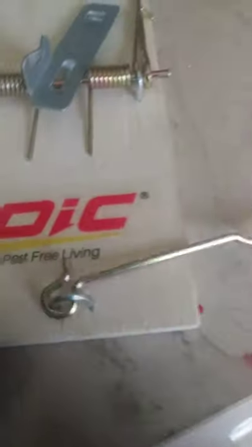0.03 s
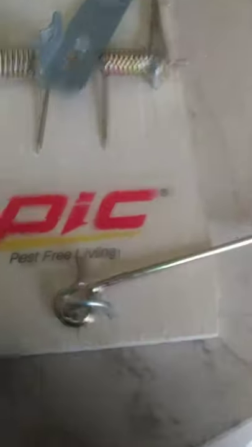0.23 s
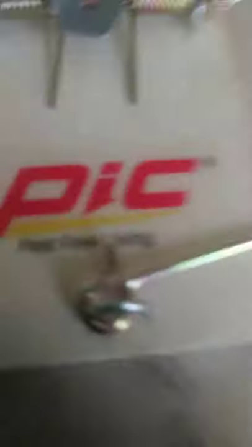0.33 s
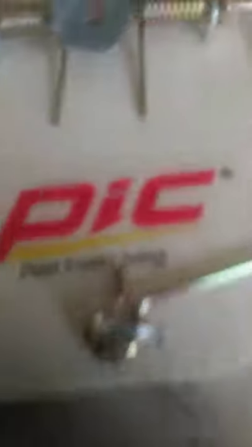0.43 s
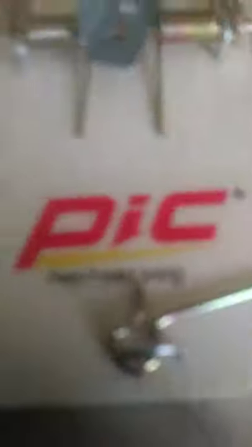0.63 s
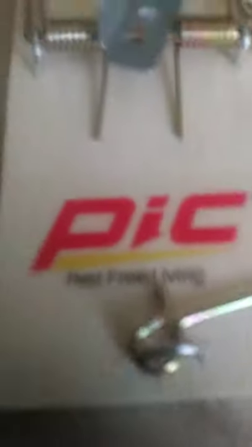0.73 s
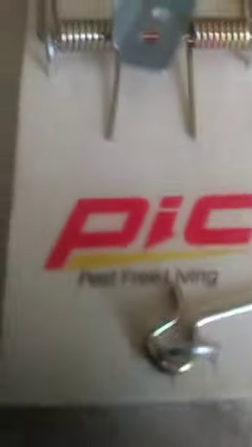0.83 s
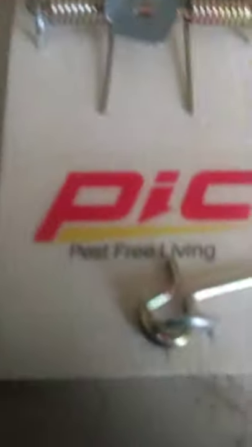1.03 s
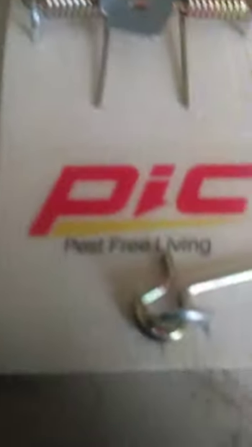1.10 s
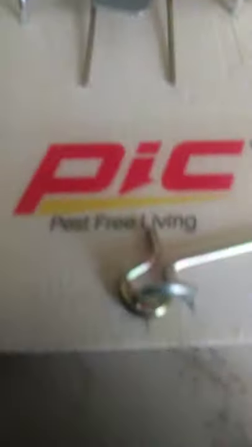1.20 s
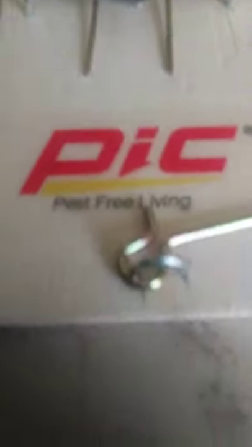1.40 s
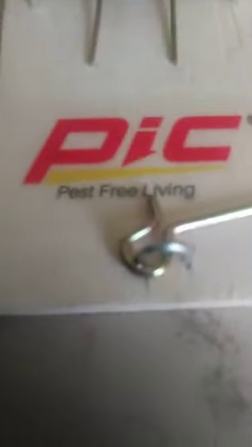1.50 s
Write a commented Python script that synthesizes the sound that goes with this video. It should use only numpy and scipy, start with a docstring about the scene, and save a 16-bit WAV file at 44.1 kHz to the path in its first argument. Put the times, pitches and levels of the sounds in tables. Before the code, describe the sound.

A finger scrapes a hand-held camera's casing right by the microphone. After a faint rustle and a soft tap at about 0.1 seconds, the loud, dry scrape runs from 0.2 to 0.5 seconds, catching with small bumps and ringing the casing slightly, then stops abruptly. Faint grip rustles and tiny ticks continue until about 1.5 seconds over quiet, steady room noise.

```python
"""A finger scrapes across a small camera's casing, right by the microphone: loud, dry, ending abruptly.
The camera is hand-held over a mousetrap in a quiet room, and the hand is shifting its grip.
The finger lands with a soft tap, then its skin sticks and slips, shaking the casing into ringing.
Before and after, the grip rustles and ticks faintly, close up, over steady room noise."""
import sys
import numpy as np
from scipy import signal
from scipy.fft import rfft, irfft
from scipy.io import wavfile

SR = 44100
rng = np.random.default_rng(int(sys.argv[2]) if len(sys.argv) > 2 else 0)


def pcm_store(signal):
    """Save signal as 16-bit PCM."""
    levels = np.round(np.clip(np.atleast_2d(signal), -1, 1) * 32767)
    wavfile.write(sys.argv[1], SR, levels.astype(np.int16).T)


N = 68355
TIME = np.arange(N) / SR

# Friction of the finger beside the microphone: (time [s], level [dB])
SCRAPE_LEVEL = [(.189, -48), (.1985, -24), (.203, -16), (.211, -13), (.225, -13), (.236, -15.5),
                (.2625, -13.5), (.2645, -18), (.28, -19), (.305, -13.5), (.311, -17.5), (.366, -20),
                (.385, -21.5), (.408, -19.5), (.428, -16), (.455, -20), (.477, -27), (.4795, -34)]
# Fine fizz of the skin, relative to the scrape: (time [s], level [dB])
FIZZ_LEVEL = [(.19, -42), (.215, -14.5), (.236, -7), (.26, -15.5), (.28, -11), (.33, -11.5), (.37, -12.5),
              (.43, -9.5), (.478, -17)]
# Spectrum of the coarse slips: (frequency [Hz], relative level [dB])
SLIP_SPECTRUM = [(40, -56), (110, -38), (200, -18), (300, -10), (450, -5), (700, -3), (1200, -2),
                 (1600, -2.5), (2100, -5.5), (2900, -7.5), (3600, -15), (5000, -24), (8000, -34.5),
                 (15500, -61)]
# Spectrum of the fizz: (frequency [Hz], relative level [dB])
FIZZ_SPECTRUM = [(300, -51), (2500, -1.5), (4500, 3), (6000, -5), (8000, -11.5), (11000, -18), (15500, -28)]
# Resonances of the casing: (frequency [Hz], relative level [dB], t60 [s])
CASING_MODES = [(461, -3, .25), (678, 2, .4), (793, -4, .25), (861, -4, .25), (911, -2, .3),
                (1043, -3, .25), (1070, -2, .25), (1135, -3, .25), (1270, -3, .25), (1335, 2, .35),
                (1395, 0, .3), (1717, -4, .25), (1958, -4, .2)]
# The finger lands and catches on the casing: (time [s], peak [dB], pitch [Hz], t60 [s])
FINGER_BUMPS = [(.1246, -20.5, 740, 0.0066), (0.2132, -22, 306, 0.06), (.2608, -3.5, 1213, 0.0059),
                (0.3047, -10, 440, 0.021), (.4165, -18, 334, 0.018), (0.4267, -12.5, 920, 0.029)]
# Close ticks of the grip: (time [s], peak [dB], centre [Hz], width [octaves], t60 [s])
GRIP_TICKS = [(.129, -40, 2800, .6, .012), (.1708, -35, 900, .8, .008), (.1752, -25, 1700, 1.1, .0015),
              (.1799, -26, 1700, 1.05, .0018), (.536, -41, 2200, .8, .006), (.6722, -40, 2200, .8, .005),
              (.6955, -41, 2800, .8, .004), (.7635, -39, 3800, .65, .016), (.8568, -36, 2200, .7, .005),
              (.964, -33, 2200, .65, .007), (1.0448, -41, 2100, .75, .006), (1.4988, -42, 3000, .75, .012)]
# Thin tones after two of the ticks: (time [s], peak [dB], pitch [Hz], t60 [s])
TICK_PINGS = [(.765, -56, 2850, .7), (.765, -62, 4260, 0.32), (1.499, -47, 3070, .04)]
# Rustle of the hand on the camera: (time [s], level [dB])
RUSTLE_LEVEL = [(0, -48), (.025, -46.5), (.06, -51), (.16, -50.5), (.178, -38), (.2, -56), (.49, -46.5),
                (.58, -51), (.64, -49.5), (.73, -55.5), (.87, -52), (.91, -49.5), (.95, -54), (1.1, -57),
                (1.35, -57.5), (1.49, -54), (1.55, -65)]
# Spectrum of the rustle: (frequency [Hz], relative level [dB])
RUSTLE_SPECTRUM = [(80, -65), (170, -26), (600, 12), (1400, 4.5), (2200, 1), (2900, 0.5), (3600, -12),
                   (4400, -11.5), (7000, -33), (15500, -30)]
# Spectrum of the opening scuff: (frequency [Hz], relative level [dB])
SCUFF_SPECTRUM = [(200, -36), (1000, 9), (3000, -6), (5300, -19), (6400, 0), (7500, -17.5), (10000, -23),
                  (15500, -48)]
# Room tone behind the hand: (frequency [Hz], relative level [dB])
ROOM_SPECTRUM = [(30, -50), (110, -44), (150, -24), (200, -5.5), (330, -3), (550, 2), (800, -3), (1000, -1),
                 (1400, -2.5), (1900, -20.5), (3000, -22.5), (3700, -19.5), (6000, -24.5), (9000, -31),
                 (15500, -34)]
# Faint hum in the room: (frequency [Hz], level [dB])
HUM_LINES = [(296, -65.5), (362, -66), (559, -62.5), (811, -58.5)]

SLIPS_PER_S = 9000
LN_1000 = np.log(1000)  # decay exponent for a 60 dB fall


def scrape(spread_db=1.5, ring_db=-13.5, judder_db=-0.04, judder_hz=263):
    """Right by the microphone, dense slips of skin shake the casing and stop dead as the finger leaves."""
    coarse = slips(SLIPS_PER_S, spread_db)
    casing = unit_rms(sum(amp(db) * ring(coarse, hz, t60) for hz, db, t60 in CASING_MODES))
    body = unit_rms(coloured(coarse, SLIP_SPECTRUM) + amp(ring_db) * casing)
    fizz = level(FIZZ_LEVEL) * coloured(slips(SLIPS_PER_S, spread_db), FIZZ_SPECTRUM)
    judder = unit_rms(amp(judder_db * wander(judder_hz)))
    touching = (TIME > SCRAPE_LEVEL[0][0]) & (TIME < SCRAPE_LEVEL[-1][0])
    return touching * level(SCRAPE_LEVEL) * judder * (body + fizz)


def bump(db, hz, t60, rise_s=0.00057, sag=0.37):
    """The finger gives the casing a dull push: a few damped cycles that sag in pitch."""
    t = np.arange(0, 2 * t60, 1 / SR)
    cycles = np.cumsum(hz * np.exp(-sag * t / t60)) / SR
    attack = 1 - np.exp(-(t / rise_s) ** 2)
    wave = np.gradient(np.cos(2 * np.pi * cycles) * attack * decay(t, t60))
    return amp(db) * wave / abs(wave).max()


def tick(db, hz, width, t60, snap=7.8):
    """A tiny dry crack of the grip, close up: a snap and a short crumble around one frequency."""
    t = TIME[:2048]
    burst = rng.standard_normal(len(t)) * decay(t, t60) + snap * (t == 0)
    octaves = np.log2((np.fft.rfftfreq(len(t), 1 / SR) + 1) / hz)
    band = np.exp(-.5 * (octaves / width) ** 2)
    wave = irfft(rfft(np.roll(burst, 20)) * band)  # the shift leaves room for the snap's onset
    return amp(db) * wave / abs(wave).max()


def ping(db, hz, t60, waver=0.014):
    """A thin, slightly unsteady tone dies away after a tick."""
    cycles = np.cumsum(hz * (1 + waver * wander(95))) / SR
    return amp(db) * np.sin(2 * np.pi * cycles) * decay(TIME, t60)


def grip(spread_db=3.5, scuff_db=-38.5):
    """The hand rustles lightly on the camera, opening with one thin scuff that fades."""
    rustle = level(RUSTLE_LEVEL) * coloured(slips(per_s=3300, spread_db=spread_db), RUSTLE_SPECTRUM)
    scuff = coloured(slips(SLIPS_PER_S, spread_db), SCUFF_SPECTRUM)
    return rustle + amp(scuff_db) * decay(TIME, t60=0.17) * scuff


def room(wash_db=-51, drift_db=0.9, flutter_db=3.5, waver_hz=3.94):
    """The quiet room in the background: a fan-like wash with a few faint, wavering hum lines."""
    tone = amp(wash_db + drift_db * wander(3.3)) * coloured(rng.standard_normal(N), ROOM_SPECTRUM)
    for hz, db in HUM_LINES:
        gain = amp(db + flutter_db * wander(2.7))
        cycles = np.cumsum(hz + waver_hz * wander(15.1)) / SR
        tone += gain * np.sin(2 * np.pi * cycles)
    return tone


def slips(per_s, spread_db):
    """Tiny random stick-slip impulses of uneven size."""
    size = amp(spread_db * np.minimum(rng.exponential(1, N), 4))
    return size * rng.choice([-1., 1.], N) * (rng.random(N) < per_s / SR)


def ring(x, hz, t60):
    """One damped mode driven by x, at rms 1."""
    pole = np.exp((2j * np.pi * hz - LN_1000 / t60) / SR)
    return unit_rms(signal.lfilter([1], [1, -pole], x).real)


def coloured(x, spectrum):
    """Filters x by (frequency [Hz], level [dB]) points, at rms 1."""
    hz, db = np.transpose(spectrum)
    bins_hz = np.fft.rfftfreq(N, 1 / SR)
    gain = amp(np.interp(np.log(bins_hz + 1), np.log(hz), db))
    return unit_rms(irfft(rfft(x) * gain, N))


def wander(hz):
    """Random drift, mostly slower than hz, at rms 1."""
    lowpass = np.exp(-(np.fft.rfftfreq(N, 1 / SR) / hz) ** 2)
    return unit_rms(irfft(rfft(rng.standard_normal(N)) * lowpass, N))


def level(points):
    """Gain over time from (time [s], level [dB]) points."""
    return amp(np.interp(TIME, *np.transpose(points)))


def decay(t, t60):
    """Gain that falls 60 dB in t60 seconds."""
    return np.exp(-LN_1000 * t / t60)


def amp(db):
    """Decibels to gain."""
    return 10 ** (np.asarray(db) / 20)


def unit_rms(x):
    """Scales to rms 1."""
    return x / np.sqrt(np.mean(x ** 2) + 1e-20)


def scene():
    """Finger and hand up close, the room behind, all at the camera's one microphone."""
    mix = scrape() + grip() + room()
    for events, source in (FINGER_BUMPS, bump), (GRIP_TICKS, tick), (TICK_PINGS, ping):
        for start_s, *settings in events:
            start = round(start_s * SR)
            sound = source(*settings)[:N - start]
            mix[start:start + len(sound)] += sound
    return mix[None]


def record(dry, low_cut_hz=146, ceiling_db=-5, knee=7, top_hz=15600):
    """The camera's recorder: a low cut, soft overload on the loudest peaks, then the band limit."""
    low_cut = signal.butter(6, low_cut_hz, "highpass", fs=SR, output="sos")
    x = signal.sosfilt(low_cut, dry)
    x = x / (1 + abs(x / amp(ceiling_db)) ** knee) ** (1 / knee)
    band_limit = signal.firwin(511, top_hz, window=("kaiser", 9), fs=SR)
    return signal.oaconvolve(x, band_limit[None], "same")


dry = scene()
out = record(dry)
pcm_store(out)
```